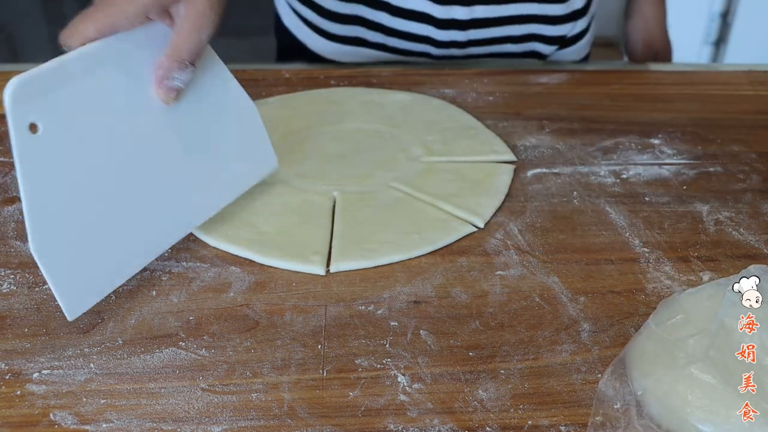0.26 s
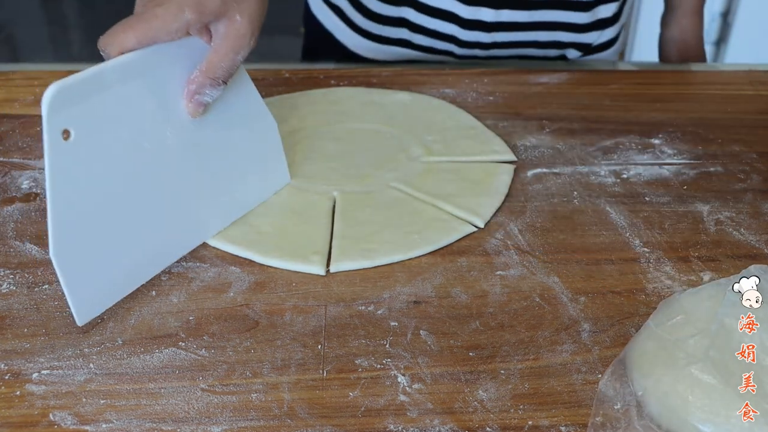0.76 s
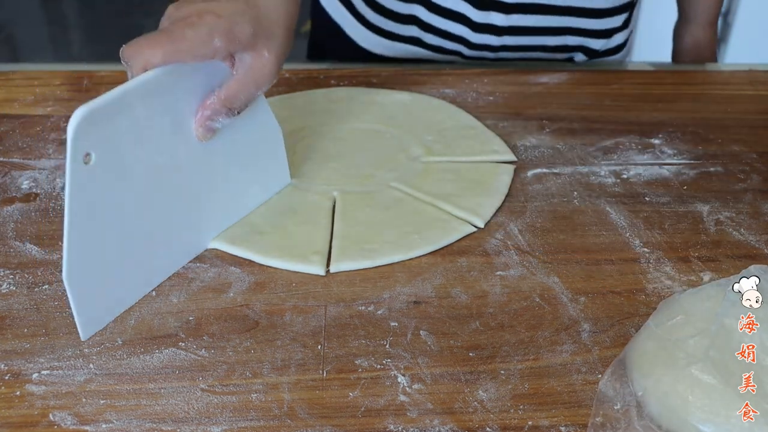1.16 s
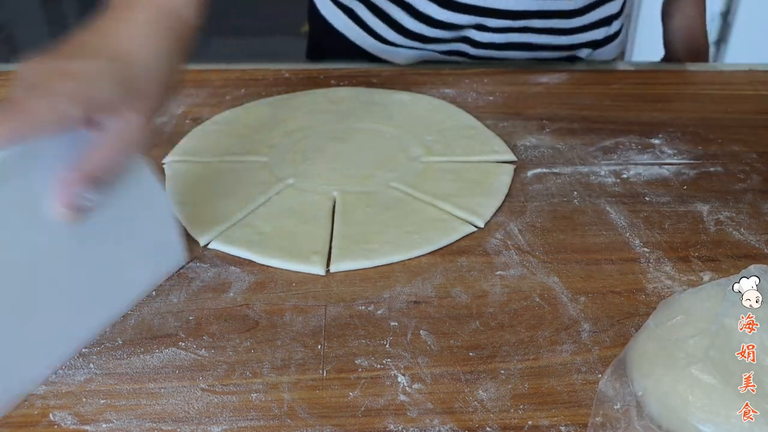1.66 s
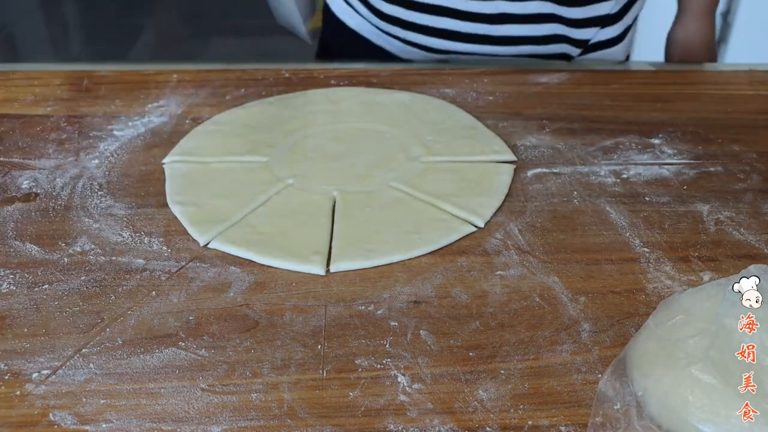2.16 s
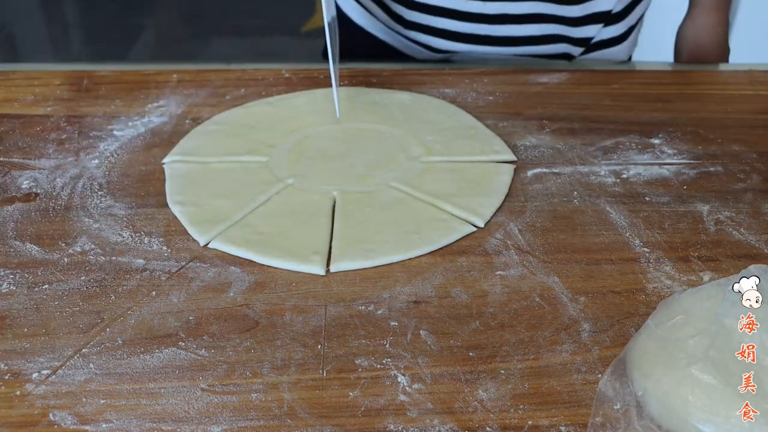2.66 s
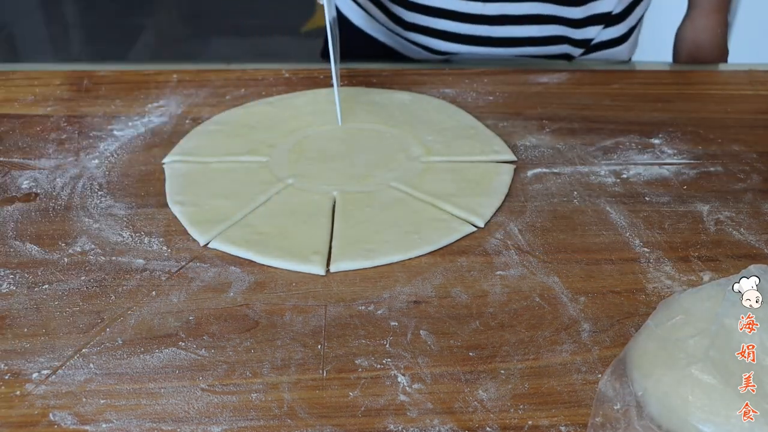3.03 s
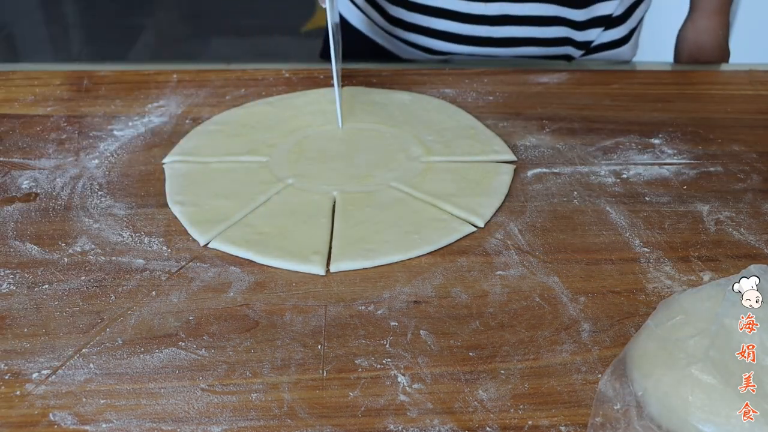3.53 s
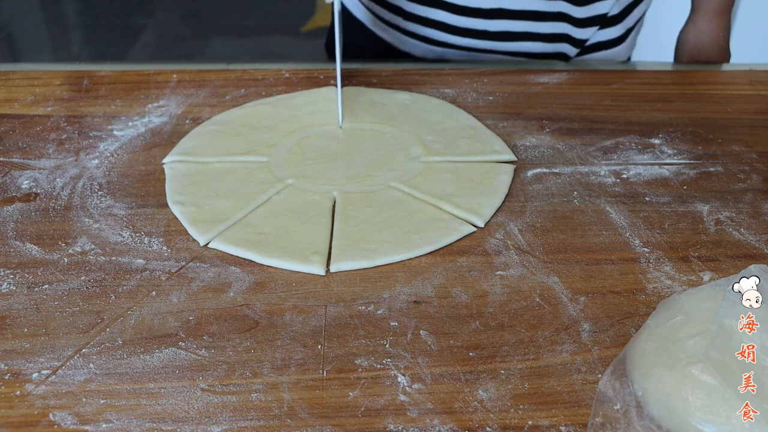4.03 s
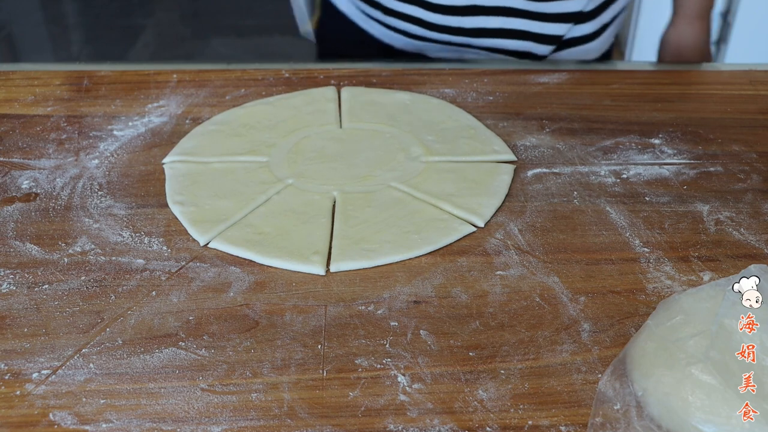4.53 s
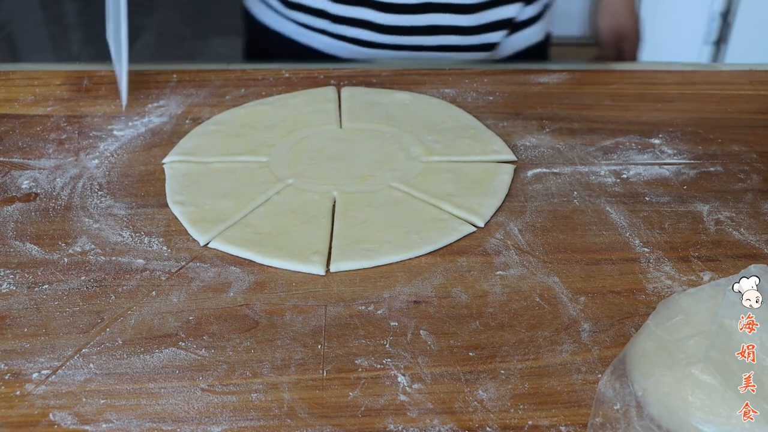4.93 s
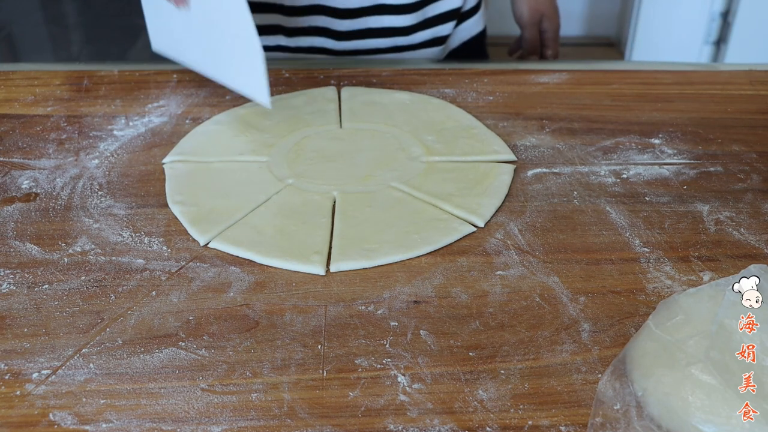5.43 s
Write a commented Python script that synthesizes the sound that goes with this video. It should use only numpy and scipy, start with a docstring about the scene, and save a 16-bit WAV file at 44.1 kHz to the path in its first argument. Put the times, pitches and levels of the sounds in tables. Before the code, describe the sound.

A plastic scraper crunches through thin dough and rasps along a wooden board twice, then knocks sharply once in a small, humming kitchen.

```python
"""A plastic scraper cuts thin dough on a floured wooden board in a small, hard kitchen.
Twice it is pressed through the dough and drawn out along the wood; then its edge knocks once on the board.
Contacts are clicks that excite blade, board and table; rasp, hiss and rustle are streams of tiny clicks.
Squeaks are rough sine tones, and flour crumbs crackle singly. Hand and sleeve rustle around the cuts, a
faint bright hiss surrounds the knock, and an appliance hums in wavering tones over diffuse room noise."""
import sys
import numpy as np
from scipy import signal
from scipy.fft import rfft, irfft
from scipy.io import wavfile

SR = 44100
rng = np.random.default_rng(int(sys.argv[2]) if len(sys.argv) > 2 else 0)


def unload_wav(signal):
    """Save mono or channel-first audio to the path in sys.argv[1] as 16-bit WAV at rate SR, clipped to [-1, 1]."""
    wavfile.write(
        sys.argv[1],
        SR,
        np.round(np.clip(np.atleast_2d(signal).T, -1, 1) * 32767).astype(np.int16),
    )


N = 250929
TIME = np.arange(N) / SR  # s


def gain_of(db):
    """Decibels to amplitude."""
    return 10 ** (np.asarray(db) / 20)


def evened(x):
    """Scales to rms 1."""
    return x / np.sqrt(np.mean(x ** 2) + 1e-20)


def read(points, hz):
    """Reads a table on a log-frequency axis."""
    f, value = np.transpose(points)
    return np.interp(np.log(hz + 1), np.log(f + 1), value)


def add(mix, s, sound):
    """Mixes a sound in at time s."""
    part = mix[round(s * SR):][:len(sound)]
    part += sound[:len(part)]


def through(x, response):
    """Convolves, channel by channel."""
    return signal.fftconvolve(np.atleast_2d(x), np.atleast_2d(response), axes=1)[:, :N]


def click(points, size=4096):
    """The shortest causal (minimum-phase) click with this spectrum, peak 1."""
    hz = abs(np.fft.fftfreq(size, 1 / SR))
    log_gain = np.log(gain_of(read(points, hz)))
    spectrum = np.exp(np.conj(signal.hilbert(log_gain)))
    wave = np.fft.ifft(spectrum).real[:size // 2]
    return wave / abs(wave).max()


def resonate(x, hz, width):
    """A resonance of gain 1 that follows the curve hz: shift down, smooth, shift back up."""
    turn = np.exp(2j * np.pi * np.cumsum(hz * np.ones(N)) / SR)
    r = np.exp(-np.pi * width / SR)
    smoothed = signal.lfilter([1 - r], [1, -r], x / turn + 1e-18)
    return 2 * (turn * smoothed).real


def waver(rate_hz):
    """Slow random variation of rms 1: noise kept below about rate_hz."""
    hz = np.fft.rfftfreq(N, 1 / SR)
    return evened(irfft(rfft(rng.standard_normal(N)) * np.exp(-(hz / rate_hz) ** 2), N))


def swell(peak_s, rise_s, fall_s, db):
    """Gain of one smooth movement: it grows to its peak and ebbs."""
    t = TIME - peak_s
    return gain_of(db) * np.exp(-(t / np.where(t < 0, rise_s, fall_s)) ** 2)


def held(start_s, end_s, rise_s, fall_s):
    """Gain of a sustained movement: attack, hold, release."""
    attack = 1 - np.exp(-np.maximum(TIME - start_s, 0) / rise_s)
    release = np.exp(-np.maximum(TIME - end_s, 0) / fall_s)
    return attack * release


def rubbing(colour, per_s, uneven_db):
    """A stream of tiny slips, each a click of the given colour, spread in size by uneven_db; rms 1."""
    chance = rng.random(N)
    size = np.minimum(rng.exponential(1, N), np.pi)
    sign = rng.choice([-1, 1], N)
    slips = (chance < per_s / SR) * sign * gain_of(uneven_db * size)
    return evened(through(slips, click(colour))[0])


# likeness of left and right in sound from all sides: f/Hz, likeness [0-1]
LIKENESS = [(60, 1), (130, 0.84), (290, 0.93), (640, 0.5), (1410, 0.13), (3100, 0), (15000, 0.06)]


def diffuse(count):
    """White noise from all sides: alike left and right in the bass, nearly unrelated in the treble."""
    a, b = rfft(rng.standard_normal((2, count)))
    same = np.clip(read(LIKENESS, np.fft.rfftfreq(count, 1 / SR)), 0, 1)
    mid = a * np.sqrt((1 + same) / 2)
    side = b * np.sqrt((1 - same) / 2)
    return irfft([mid + side, mid - side], count)


# how long the kitchen rings: f/Hz, t60/s
KITCHEN_DECAY = [(100, 0.4), (300, 0.85), (600, 0.69), (1100, .67), (2200, 0.65), (5000, 0.56),
                 (13000, 0.25)]


def reverberation(build_s=0.0046, early=0.86, early_s=0.019):
    """The kitchen's tail: it builds up, comes in clumps at first, then dies smoothly band by band."""
    hz, t, bands = signal.stft(diffuse(SR), SR, nperseg=512)
    decay = np.exp(-np.log(1000) * t / read(KITCHEN_DECAY, hz)[:, None])
    tail = signal.istft(bands * decay, SR, nperseg=512)[1]
    t = np.arange(tail.shape[1]) / SR
    tail *= (1 - np.exp(-(t / build_s) ** 2)) * (1 + early * np.exp(-t / early_s))
    clumps = .5 * np.exp(-t / .07)
    tail *= (1 + clumps * waver(rate_hz=470)[:len(t)]) / np.sqrt(1 + clumps ** 2)
    return tail / np.linalg.norm(tail[0])


# near walls and table top, a list for left and a list for right: delay t/s, level/dB against direct sound
NEAR_ECHOES = [
    [(.0102, -9), (.0124, -7), (.0148, -12), (.0204, -12), (.0283, -15)],
    [(.0021, -8), (.0104, -7), (.0150, -12), (.0212, -12), (.0382, -12)],
]


def near_paths(right_db):
    """Direct sound and the first distinct echoes; right_db is how much louder the right side is."""
    taps = np.zeros((2, SR // 10))
    taps[:, 0] = 1
    for side, echoes in zip(taps, NEAR_ECHOES):
        for s, db in echoes:
            side[round(s * SR)] += gain_of(db)
    return taps * gain_of([[-right_db / 2], [right_db / 2]])


def placed(x, tail, wet, right_db):
    """Blends the direct sound with the room at constant power and leans it right by right_db."""
    wet = np.clip(wet, 0, 1)
    blend = np.sqrt(1 - wet) * x + np.sqrt(wet) * through(x, tail)
    return blend * gain_of([[-right_db / 2], [right_db / 2]])


# tint of the kitchen's air noise: f/Hz, relative level/dB per Hz
AIR_TINT = [(25, -14), (50, -21), (62, -9), (80, -5), (112, -11.5), (150, -10.5), (200, -4.5), (275, -9.5),
            (500, -10.5), (650, -11.5), (1140, -15), (1550, -16.5), (1750, -20.5), (5900, -29.5),
            (12500, -35), (15500, -43)]
# the appliance's steady hum: f/Hz, rms level/dB
HUM_LINES = [(37, -81), (58.5, -69.5), (99.7, -64.5), (133.6, -60), (214.2, -62.5), (500.6, -70.5),
             (650.5, -69), (750, -90)]


def background(air_db=-53.5, waver_depth=0.29, waver_hz=4):
    """Diffuse room noise and the slightly wavering lines of an appliance."""
    tint = gain_of(read(AIR_TINT, np.fft.rfftfreq(N, 1 / SR)))
    air = irfft(rfft(diffuse(N)) * tint, N)
    hum = np.zeros(N)
    for hz, db in HUM_LINES:
        drift = 1 + waver_depth * (waver(waver_hz) + 1j * waver(waver_hz))
        tone = np.exp(2j * np.pi * (hz * TIME + rng.random()))
        hum += gain_of(db) * evened((drift * tone).real)
    return gain_of(air_db) * evened(air) + hum


# flour crumbs cracking under the edge: t/s, peak level/dB before placing in the room
CRUMB_SNAPS = [(0.508, -49), (0.648, -41.5), (0.728, -41.5), (0.809, -40.5), (1.070, -40), (1.223, -46),
               (1.748, -35.5)]
# colour of flour, in snaps and in hiss: f/Hz, relative level/dB
FLOUR_COLOUR = [(1500, -10), (2800, 5), (3700, 3), (4700, 0), (6000, -6.5), (9000, -8.5), (12500, -7),
                (15500, -21)]
# fine, bright colour of cloth, lent to the faint crackle as well: f/Hz, relative level/dB
CLOTH_COLOUR = [(600, -17), (2000, 7), (3000, 1), (4000, 2), (6500, 0), (9500, -1), (12700, 1.5),
                (15500, -11)]


def crumbs(tail, crackle_db=-75, until_s=1.2, resting=0.28):
    """Flour crackles faintly, most while the blade is first pressed down; single grains snap louder."""
    pressing = np.maximum(held(0, until_s, rise_s=.02, fall_s=.12), resting)
    snaps = gain_of(crackle_db) * pressing * rubbing(CLOTH_COLOUR, per_s=310, uneven_db=10)
    for s, db in CRUMB_SNAPS:
        add(snaps, s, gain_of(db) * click(FLOUR_COLOUR))
    return placed(snaps, tail, wet=0.24, right_db=10.5)


# hand and sleeve rustles, a flick of flour as the first draw ends, and a faint bright hiss around the knock: #
# peak t/s, rise t/s, fall t/s, level/dB before the common lift
SOFT_HISSES = [(0.02, 0.054, 0.034, -61), (1.755, 0.018, 0.056, -63.5), (1.885, 0.016, 0.022, -57.5),
               (1.962, 0.044, .04, -59), (2.15, 0.068, 0.1, -59), (2.41, 0.12, 0.12, -67.5),
               (4.54, 0.14, 0.19, -65), (4.7, .015, 0.022, -58), (5.075, 0.022, 0.033, -62),
               (5.215, 0.042, 0.078, -61)]


def rustles(tail, lift_db=6.0):
    """Dense tiny clicks swell as skin and cloth rustle, as flour is flicked, and as a faint bright hiss around
    the knock."""
    grains = np.array([rubbing(CLOTH_COLOUR, per_s=12000, uneven_db=5.0) for _ in range(2)])
    strength = np.linalg.norm([swell(*row) for row in SOFT_HISSES], axis=0)
    return placed(gain_of(lift_db) * grains * strength, tail, wet=0.25, right_db=0.2)


def flexed(x, hz=1200, q=1.33):
    """Bending waves cross the blade slowly near its main mode, smearing a clack over a millisecond."""
    a = signal.iirpeak(hz, q, fs=SR)[1]
    return signal.lfilter(a[::-1], a, x)  # all-pass: only the timing changes


# modes of the board: f/Hz, relative level/dB, t60/s
BOARD_MODES = [(349, -2, 0.29), (399, 4.5, 0.16), (488.4, -2, 0.33), (528, -13.5, 0.84), (654.5, -1, 0.18),
               (743, 2, 0.13), (840, -31, .3), (840, -2, 0.2), (921, -4.5, 0.47), (1006, -19, .3),
               (1040, -15, 0.74), (1100, -17, 0.31), (1194, -0.5, 0.16), (1257, -7, 0.14),
               (1367, -21, 0.48), (1574, -35, .3), (1763, -9, 0.18)]


def board_ring(rise_s=0.0081):
    """The heavy board takes a moment to swing up, then its modes die away."""
    t = np.arange(SR) / SR
    modes = np.zeros(SR)
    for hz, db, t60 in BOARD_MODES:
        modes += gain_of(db) * 1000. ** (-t / t60) * np.sin(2 * np.pi * hz * t)
    return modes * (1 - np.exp(-(t / rise_s) ** 2))


def table_thump(hz=137, t60=0.23, rise_s=0.022):
    """The table under the board swings up slowly in one deep mode."""
    t = np.arange(SR // 2) / SR
    decay = np.exp(-np.log(1000) * t / t60)
    return np.sin(2 * np.pi * hz * t) * decay * (1 - np.exp(-(t / rise_s) ** 2))


# share of a clack and of a push that sets the board ringing (dB)
CLACK_RING_DB, PUSH_RING_DB = -24.5, -23.5
# relative share of a clack and of a firm push that reaches the table (dB); dough soaks up lighter pushes
CLACK_THUMP_DB, PUSH_THUMP_DB, FIRM_PUSH_DB = -27.5, -9.5, -28
# the blade meeting the board: t/s, impulse level/dB of hard clack, of dull push through dough
CONTACTS = [(0.459, -44, -43), (0.776, -46, -43), (0.8985, -43, -38.5), (1.184, -38, -36),
            (1.2228, -34, -41), (1.745, -33, -31.5), (3.665, -45, -50), (3.801, -54, -43),
            (3.843, -54, -37), (3.9214, -30, -27.5), (3.9353, -41, -26.5), (3.9496, -46, -30),
            (3.9578, -52, -31), (3.995, -52, -36), (4.045, -50, -42), (4.278, -36, -44), (5.0752, 1.5, -36)]
# the hand-damped blade's clack: f/Hz, relative level/dB
CLACK_COLOUR = [(80, -56), (300, -11.5), (500, -12.5), (840, -1.5), (1100, 8), (1330, 0.5), (1600, 1.5),
                (1850, -7.5), (2200, -4.5), (2800, -14), (3500, -45), (4700, -32.5), (8000, -44),
                (15000, -55)]
# what blade and board together send out into the room: f/Hz, relative level/dB
ROOM_COLOUR = [(70, -43), (130, -22), (270, -16.5), (370, -12), (620, -8), (850, -3.5), (1170, -3.5),
               (1400, -7.5), (1730, -8.5), (2000, -18), (2400, -21), (3100, -33.5), (4700, -46),
               (8000, -66), (13000, -63)]
# a push cushioned by dough: f/Hz, relative level/dB
PUSH_COLOUR = [(40, -32), (130, 4.5), (420, 8.5), (850, 5.5), (1300, -7.5), (2400, -4), (3100, -33),
               (6000, -28), (14000, -52)]


def blows(tail, room_db=-4.0, push_room_db=-10, thump_db=3):
    """Each contact clacks the blade, shoves the board and sets board and table ringing."""
    forces = np.zeros((2, N))
    for s, *levels_db in CONTACTS:
        forces[:, round(s * SR)] = gain_of(levels_db)
    clack, push = forces
    firmness = np.minimum(push / gain_of(FIRM_PUSH_DB), 1) ** 2
    ring = gain_of(CLACK_RING_DB) * clack + gain_of(PUSH_RING_DB) * push
    thump = gain_of(CLACK_THUMP_DB) * clack + gain_of(PUSH_THUMP_DB) * firmness * push
    shove = -through(push, click(PUSH_COLOUR))  # the board gives way: the pressure dips first
    blade = through(clack, flexed(click(CLACK_COLOUR)))
    near = through(blade + shove, near_paths(right_db=3.0))
    sent_out = gain_of(room_db) * through(clack, click(ROOM_COLOUR)) + gain_of(push_room_db) * shove
    far = through(sent_out, tail)
    table = gain_of(thump_db) * through(thump, table_thump())
    return near + far + through(ring, board_ring()) + table


# every draw gathers speed, holds, and dies as the edge lifts (s)
DRAW_RISE_S, DRAW_LIFT_S = 0.043, .01
# the blade's main resonance holds, then sags as the grip loosens towards the end of a draw
BLADE_HZ, SAG_S = 1423, 0.081
# the hiss thins as the edge sweeps the flour away (dB per s)
SWEPT_DB_PER_S = -6
# the edge drawn out along the wood: start t/s, end t/s, rasp level/dB at the start,
# flour hiss level/dB at the start (before its lift), change of pressure [dB per s], blade's final f/Hz
BLADE_DRAWS = [(1.276, 1.745, -40, -50.5, -11.5, 1200), (4.054, 4.445, -47.5, -61, 6.5, 960)]


def drawing():
    """Strength of rasp and of flour hiss, and the blade's pitch, as the edge is drawn along the wood."""
    rasp, hiss, hz = np.zeros(N), np.zeros(N), np.zeros(N) + BLADE_HZ
    for start, end, rasp_db, hiss_db, db_per_s, final_hz in BLADE_DRAWS:
        elapsed = np.clip(TIME, start, end) - start
        pressure = held(start, end, DRAW_RISE_S, DRAW_LIFT_S) * gain_of(db_per_s * elapsed)
        rasp += gain_of(rasp_db) * pressure
        hiss += gain_of(hiss_db + SWEPT_DB_PER_S * elapsed) * pressure
        hz += (final_hz - BLADE_HZ) * np.exp(-abs(TIME - end) / SAG_S)
    return rasp, hiss, hz


# the blade shoving through dough, going in and coming out: peak t/s, rise t/s, fall t/s, level/dB
DOUGH_SHOVES = [(1.2, 0.22, 0.42, -54), (1.74, 0.051, 0.017, -48), (3.83, 0.081, 0.028, -52.5),
                (4.01, 0.041, 0.16, -52), (4.46, 0.017, 0.034, -48.5)]
# colour of the edge rasping on wood: f/Hz, relative level/dB
RASP_COLOUR = [(300, -34), (580, -7.5), (780, 0.5), (1050, 1), (1450, -2.5), (1850, 1), (2050, -0.5),
               (2350, -2), (3000, -12), (4000, -37), (8000, -35)]
# the blade's other modes while its edge is held on the wood: f/Hz, width [Hz], relative level/dB
HELD_BLADE_MODES = [(885, 130, 3), (1070, 170, -1), (1650, 100, 3), (2000, 110, -4), (2300, 160, -13)]
# dull colour of dough dragging: f/Hz, relative level/dB
DRAG_COLOUR = [(90, -38), (160, -15), (260, 0), (400, -2), (600, -7), (850, -6), (1300, -19.5), (3000, -42)]


def cuts(tail, sing_db=-3, width_hz=130, modes_db=-8, judder_db=1.5, graze_db=-6, flour_db=6.0):
    """The edge chatters over the grain and rings the blade; flour hisses and the dough drags."""
    drawn, hiss, blade_hz = drawing()
    shoved = sum(swell(*row) for row in DOUGH_SHOVES)
    contact = np.hypot(drawn, gain_of(graze_db) * shoved)  # in the dough the edge only grazes the wood
    judder = gain_of(judder_db * waver(rate_hz=55))  # the edge catches and lets go
    slips = rubbing(RASP_COLOUR, per_s=3500, uneven_db=0.0) * judder
    singing = evened(resonate(slips, blade_hz, width_hz))
    modes = evened(sum(gain_of(db) * resonate(slips, hz, width) for hz, width, db in HELD_BLADE_MODES))
    rasp = evened(slips + gain_of(sing_db) * singing + gain_of(modes_db) * modes) * contact
    drag = rubbing(DRAG_COLOUR, per_s=700, uneven_db=3.5) * shoved
    grains = np.array([rubbing(FLOUR_COLOUR, per_s=9000, uneven_db=0.5) for _ in range(2)])
    flour = grains * hiss * gain_of(flour_db) * np.sqrt(judder)
    return placed(rasp + drag, tail, wet=0.33, right_db=2.0) + placed(flour, tail, wet=0.1, right_db=0.0)


# the edge grabs and the blade briefly sings on one mode: t/s, length t/s, f/Hz, rms level/dB before placing
EDGE_SQUEAKS = [(1.426, .04, 1310, -45.5), (1.468, 0.064, 1300, -51), (1.555, 0.098, 1535, -54),
                (4.136, 0.061, 1410, -52), (4.38, 0.046, 840, -48), (4.382, 0.044, 2335, -50),
                (4.41, 0.033, 1516, -47)]


def squeaks(tail, width_hz=70):
    """Short, rough tones where stick and slip lock onto the blade."""
    tones = np.zeros(N)
    for s, length, hz, db in EDGE_SQUEAKS:
        count = round(length * SR)
        # uneven slips: random phase steps, in turns
        jitter = rng.standard_normal(count) * np.sqrt(width_hz / (2 * np.pi * SR))
        tone = np.sin(2 * np.pi * np.cumsum(hz / SR + jitter))
        add(tones, s, gain_of(db) * evened(np.hanning(count) * tone))
    return placed(tones, tail, wet=0.22, right_db=1.0)


def scene():
    """Everything on the board shares one room."""
    tail = reverberation()
    return blows(tail) + cuts(tail) + squeaks(tail) + crumbs(tail) + rustles(tail) + background()


def record(dry, edge_hz=15750):
    """Clips peaks beyond 0.98, then cuts the treble steeply around edge_hz."""
    low_pass = signal.firwin(511, edge_hz, window=("kaiser", 9), fs=SR)
    return signal.oaconvolve(np.clip(dry, -.98, .98), low_pass[None], "same")


dry = scene()
out = record(dry)
unload_wav(out)
```